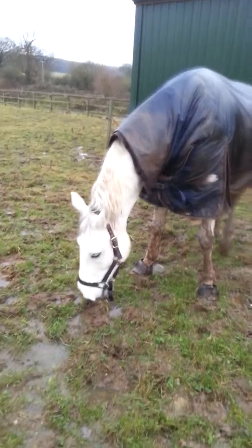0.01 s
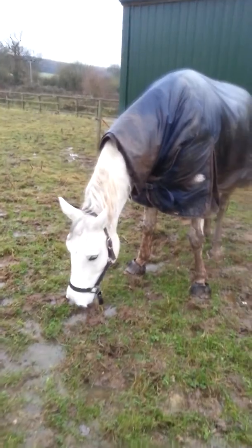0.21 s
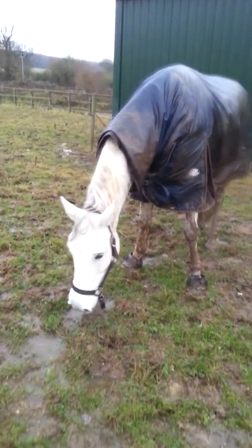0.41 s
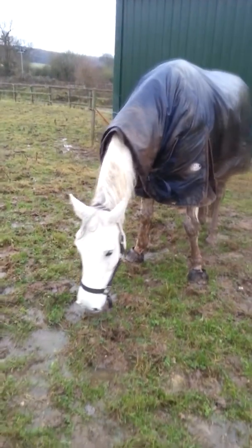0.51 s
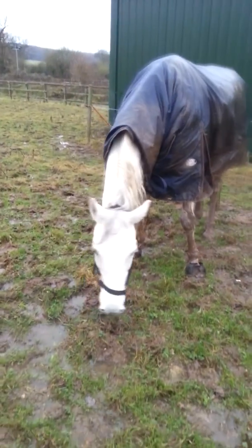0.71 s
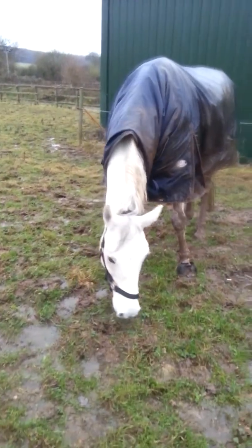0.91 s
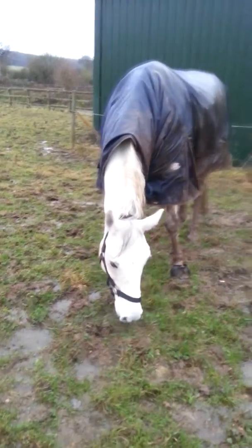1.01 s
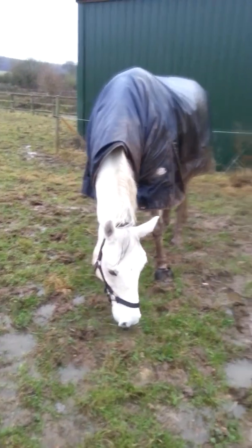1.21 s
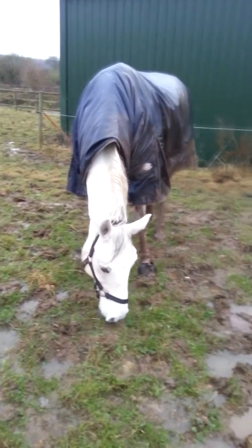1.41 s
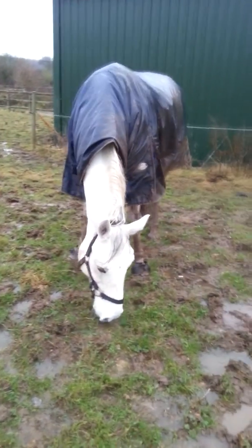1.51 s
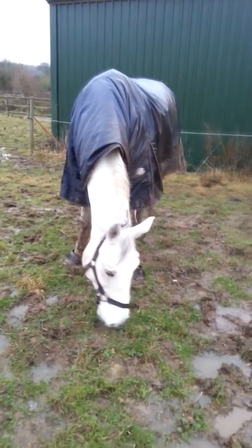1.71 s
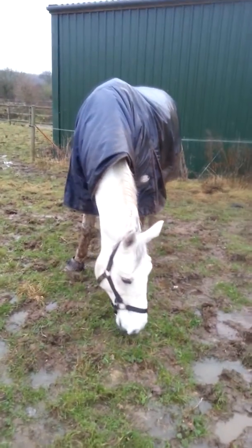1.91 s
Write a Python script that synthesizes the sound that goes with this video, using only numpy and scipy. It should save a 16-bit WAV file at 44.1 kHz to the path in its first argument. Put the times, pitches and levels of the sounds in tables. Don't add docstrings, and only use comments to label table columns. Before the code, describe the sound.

Close stereo outdoors: a brief crackly sniff leads into a single loose, rapid flapping horse snort under a second long, followed by soft rustle, tiny ticks and low wind thumps on the right channel.

```python
import sys
import numpy as np
from scipy import signal
from scipy.fft import rfft, irfft
from scipy.io import wavfile

SR = 44100
rng = np.random.default_rng(int(sys.argv[2]) if len(sys.argv) > 2 else 0)


def transcribe(signal):
    frames = np.atleast_2d(signal).T
    limited = np.clip(frames, -1, 1)
    pcm = np.round(limited * 32767).astype(np.int16)
    wavfile.write(sys.argv[1], SR, pcm)


def linear_from_db(decibels):
    return 10 ** (np.asarray(decibels, float) / 20)


N = 88200

# flaps so far, time in seconds.
NEAR_PACE = [(0, .2387), (1, .2693), (2, .3004), (3, .3332), (4, .3642), (5, .3972), (6, .4315), (8, .5),
             (10, .5662), (11, .6001), (13, .6656), (16, .7689), (17, .805), (18, .8426), (19, .8836)]
FAR_PACE = [(0, .2297), (1, .2633), (2, .2977), (3, .3312), (5, .4072), (6, .4455), (8, .5236), (9, .5624),
            (10, .601), (12, .6754), (13, .714), (15, .796), (16, .838)]
# time in seconds, level in dB.
NEAR_FORCE = [(.235, -5.5), (.27, -1), (.335, -1), (.365, -8), (.4, -13), (.43, -13.5), (.5, -15.5),
              (.55, -11), (.6, -15.5), (.68, -15.5), (.77, -11), (.81, -12.5), (.885, -24)]
FAR_FORCE = [(0.227, -17), (.263, -5), (.3, -0.5), (.335, -7.5), (.37, -5), (.41, -11), (.485, -15.5),
             (.53, -12.5), (.6, -14), (.64, -13.5), (.72, -18), (.76, -24), (.84, -22.5)]
# time in seconds, pitch in Hz.
NEAR_COLUMN = [(.235, 716), (.27, 756), (.335, 733), (.4, 665), (.57, 670), (0.599, 566), (.64, 734),
               (.77, 725), (.885, 660)]
FAR_COLUMN = [(.227, 630), (.263, 640), (.3, 690), (.37, 654), (.44, 660), (.485, 540), (.55, 710),
              (.71, 520), (.76, 680), (.84, 620)]
# time in seconds, level in dB.
WETNESS = [(.235, -10), (.27, -1.5), (.3, -1), (.335, -17.5), (.43, -2.5), (.58, -5.5), (.68, -10),
           (.77, 1), (.88, -14)]
# pitch in Hz, width in Hz, level in dB, left over right in dB.
NASAL = [(1357, 350, -14.5, -2), (2322, 396, -15.5, -6), (3000, 337, -19, 1), (3820, 660, -21.5, -8),
         (4740, 330, -27.5, -7.5)]
# time in seconds, level in dB.
OPENING = [
    (.235, -13),
    (.35, -5.5),
    (.5, -2.5),
    (.58, 6),
    (.7, -1.5),
    (.85, -6.5),
]
# time in seconds, level in dB.
FLOW = [
    (.19, -57),
    (.235, -36.5),
    (.28, -34.5),
    (.34, -33),
    (.42, -42),
    (.8, -41.5),
    (.89, -43.5),
    (.93, -49),
    (1.0, -55),
]
# time in seconds, level in dB.
HISS = [
    (.19, -54.5),
    (.25, -42),
    (.29, -41),
    (.33, -36),
    (.43, -48.5),
    (.6, -55),
    (.86, -65),
    (.893, -41.5),
    (.94, -57),
]
# time in seconds, level in dB.
SNIFF = [
    (.1, -65),
    (.128, -39),
    (.1315, -40),
    (.134, -29.5),
    (.14, -31),
    (.152, -42),
    (.167, -33),
    (.182, -43.5),
    (.2, -43),
]
# time in seconds, level in dB.
SNIFF_HISS = [(.097, -60), (.103, -46), (.12, -43.5), (.13, -51), (.14, -46), (.155, -53), (.17, -55),
              (.2, -53)]
# pitch in Hz, width in Hz, level in dB.
MUZZLE = [(796, 160, 0), (1175, 134, 1), (1350, 190, 5), (1800, 370, 3.5), (2400, 330, 2),
          (3300, 1050, 4.5), (4430, 560, -3), (5500, 880, 2)]
# time in seconds, level in dB, pitch in Hz.
BUFFETS = [(.009, -30, 175), (0.022, -32, 123), (0.2054, -18.5, 212), (0.852, -19, 230), (0.868, -22, 203),
           (.876, -17, 230), (0.895, -24, 254), (.965, -37, 200), (1.052, -41, 224), (1.063, -27.5, 226),
           (1.077, -26, 169), (1.117, -25.5, 139), (1.127, -27.5, 278), (1.258, -35, 230),
           (1.316, -28.5, 186), (1.327, -23, 230), (1.505, -21.5, 176), (1.513, -19, 209),
           (1.521, -22.5, 178), (1.538, -36, 200), (1.5446, -26, 203), (1.55, -31, 172), (1.562, -24, 210),
           (1.569, -30.5, 150), (1.584, -35, 204), (1.602, -30, 225), (1.643, -24, 267), (1.664, -24, 282),
           (1.706, -14.5, 270), (1.713, -10.5, 296), (1.75, -12.5, 274), (1.756, -22, 243),
           (1.772, -19.5, 245), (1.787, -28.5, 243)]
# time in seconds, level in dB.
GUST = [(0, -41.5), (.06, -55.5), (.19, -54), (.25, -36.5), (.5, -42), (.8, -39), (.9, -44), (1.0, -44.5),
        (1.14, -49.5), (1.3, -43), (1.45, -49.5), (1.52, -36), (1.62, -41), (1.7, -36.5), (1.78, -30),
        (1.82, -59.5), (2, -59)]
# time in seconds, peak in dB,
# ring in Hz, left over right in dB, snap in dB.
TICKS = [(0.075, -34, 1300, -7, 11), (.0765, -29, 2650, 1, -11), (.263, -12.5, 3130, -13, -18),
         (.2678, -6, 2410, -10, -25), (0.2999, -14.5, 2400, -9, -25), (.334, -40, 5500, -4, 6),
         (.288, -17, 4830, -12, -20), (.291, -27.5, 5000, -14, -20), (.694, -26, 3800, -6, -9),
         (.997, -37, 1990, -3, 3), (0.104, -35, 3300, -13, 13.5), (0.31, -16, 2270, 10, -22),
         (.321, -14.5, 2400, -9, -23), (0.388, -20.5, 2020, 2, -6), (0.89, -18, 3140, -2, -26),
         (.9404, -40, 3500, 14, 10), (1.035, -38.5, 4950, 19, -6), (1.062, -43.5, 3000, -16, 18),
         (1.0826, -33, 1040, 0, -11), (1.1199, -26, 1450, -6.5, 7), (1.1209, -26, 3200, -10, 1),
         (1.1794, -38.5, 2040, 8, -3), (1.2685, -47, 1150, 5, -3), (1.4253, -51, 3000, 2, 3),
         (1.472, -34.5, 2500, 1, -2), (1.487, -37, 1430, -12, 5), (1.5725, -34.5, 1560, -13.5, 9),
         (1.617, -35, 1160, -16, 14.5), (1.629, -38, 1350, -14, 15.5), (1.7048, -30, 3580, -6, -7),
         (1.733, -32, 2600, -2, -9), (1.737, -29, 2190, -3, -9), (1.743, -34, 2400, -3, -9),
         (1.7774, -30, 1350, -8.5, 5.5), (1.778, -29, 650, -7, -20), (1.804, -38, 2150, -8, -9),
         (1.84, -44, 1530, -3, 0)]
# time in seconds, level in dB.
RUSTLE = [(0, -53.5), (.8, -51), (.95, -54.5), (1.13, -50), (1.25, -57.5), (1.41, -53.5), (1.45, -48),
          (1.52, -50), (1.58, -47), (1.65, -55.5), (1.8, -59), (2, -63.5)]
# pitch in Hz, level in dB per Hz.
AIR = [(30, -3.5), (200, -3.5), (560, -1), (1100, -2.5), (1800, -9), (3700, -18.5), (6200, -20.5),
       (9000, -19)]
# pitch in Hz, likeness where 1 is the same.
LIKENESS = [(60, 0.97), (300, 0.75), (640, 0.7), (1400, 0), (3000, 0), (7000, 0)]
# pitch in Hz, left over right in dB.
LEAN = [(60, -14), (180, 6.5), (540, -3.5), (1630, -2.5), (4910, -11), (14800, -1.5)]

NEAR_HZ, NEAR_WIDTH_HZ, FAR_WIDTH_HZ = 640, 234, 360
SOFT_HZ, VENT_HZ = 690, 170
LEAD_S = .0021
FLAP_LUCK_DB, MODE_LUCK_DB = .7, 3.5
SPRAY_S, SPRAY_DB = 0.0062, -5
SIBILANT_HZ, SIBILANT_DB = 3500, -3.5
HORSE_PAN_DB, PORT_LAG = -4, 4
GROUND_S, GROUND_DB = .0037, -12
WIND_HZ, BUFFET_DAMPING = 230, 1
TICK_CYCLES = 5.8
SNAP_HZ, SNAP_WIDTH_HZ = 4300, 1800
RUSTLE_PER_S = 2500
DRIP_S, DRIP_DB, DRIP_HZ = 1.976, -41, 420
AIR_DB = -49.5
HEADROOM, CUTOFF_HZ = .95, 15200


def rms_one(x):
    return x / np.sqrt(np.mean(x ** 2) + 1e-20)


def in_time(rows):
    return np.interp(np.arange(N) / SR, *np.transpose(rows), left=-120, right=-120)


def at_hz(points, hz):
    f, v = np.transpose(points)
    return np.interp(np.log(np.maximum(hz, 20)), np.log(np.maximum(f, 20)), v)


def cut(x, hz, kind, order=2):
    return signal.sosfilt(signal.butter(order, hz, kind, fs=SR, output="sos"), x)


def drift(rate):
    noise = rng.standard_normal(N + 9000)
    return rms_one(cut(noise, rate, "low")[-N:])


def ring(x, hz, width_hz):
    r, w = np.exp(-np.pi * width_hz / SR), 2 * np.pi * hz / SR
    return signal.lfilter([0, np.sin(w)], [1, -2 * r * np.cos(w), r * r], x + 1e-18)


def body(x, peaks):
    out = 0
    for k, (hz, width, db, *_) in enumerate(peaks):
        out = out + (-1) ** k * linear_from_db(db) * ring(x, hz, width)
    return out


def grains(rate, spread_db):
    sizes = linear_from_db(spread_db * np.minimum(rng.exponential(1, N), 4)) * rng.choice([-1, 1], N)
    return rms_one(sizes * (rng.random(N) < rate / SR))


def place(x, pan_db):
    return np.array([np.roll(x, -PORT_LAG), x]) * linear_from_db(np.array([[pan_db / 2], [-pan_db / 2]]))


def horse():
    near = nostril(NEAR_PACE, NEAR_FORCE, NEAR_COLUMN, NEAR_WIDTH_HZ)
    far = nostril(FAR_PACE, FAR_FORCE, FAR_COLUMN, FAR_WIDTH_HZ)
    direct = near + far + breath() + sniff()
    return direct + linear_from_db(GROUND_DB) * np.roll(direct, int(GROUND_S * SR), axis=1)


def nostril(pace, force, column, width_hz):
    count, when = np.transpose(pace)
    flap_times = np.interp(np.arange(count[-1] + 1), count, when) - LEAD_S
    at = (flap_times * SR).astype(int)
    luck = rng.standard_normal((len(at), 1 + len(NASAL)))
    strength = linear_from_db(np.interp(at / SR, *np.transpose(force)) + 4.5 + FLAP_LUCK_DB * luck[:, 0])

    knocks = np.zeros(N + 2000)
    column_hz = np.interp(at / SR, *np.transpose(column))
    for i, hit, hz in zip(at, strength, column_hz):
        knocks[i:i + 2000] += hit * ring(np.arange(2000) == 0, hz, width_hz)
    soft = cut(cut(knocks[:N], SOFT_HZ, "low", order=6), VENT_HZ, "high")
    out = place(soft, HORSE_PAN_DB)

    spray = rng.standard_normal((2, N)) * linear_from_db(SPRAY_DB - 17.5)
    fade = np.exp(-1 / (SPRAY_S * SR))
    wet_db = np.interp(at / SR, *np.transpose(WETNESS))
    opening_db = np.interp(at / SR, *np.transpose(OPENING))
    for k, (top_hz, top_width, db, pan_db) in enumerate(NASAL):
        slap_db = wet_db + (k == 0) * opening_db + db + MODE_LUCK_DB * luck[:, 1 + k]
        slaps = np.zeros(N)
        slaps[at + 45] = strength * linear_from_db(slap_db)
        both = place(slaps, pan_db)
        droplets = signal.lfilter([1], [1, -fade], both) * spray
        ringing = ring(both + droplets, top_hz, top_width)
        out = out + cut(ringing, [top_hz * 0.89, top_hz * 1.235], "band", order=1)
    return out


def breath():
    air = rng.standard_normal((5, N))
    low = rms_one(cut(ring(air[0], NEAR_HZ, 550), 1014, "low", order=4))
    top = rms_one(cut(body(air[1:3], NASAL), 1920, "high"))
    top = top + linear_from_db(SIBILANT_DB) * cut(air[3:], [SIBILANT_HZ, 10000], "band")
    lean = linear_from_db(np.array([[-2.0], [2.0]]))
    stream = place(linear_from_db(in_time(FLOW) + 3.9 * drift(46)) * low, HORSE_PAN_DB)
    return stream + linear_from_db(in_time(HISS) + 2.2 * drift(73)) * top * lean


def sniff():
    wet = grains(3000, 1.3) + 1.2 * np.array([grains(3000, 5.1), grains(3000, 1.9)])
    lean = linear_from_db(np.array([[-2.5], [2.5]]))
    thin = cut(wet, [2600, 5200], "band") + linear_from_db(-8) * cut(wet, [5000, 12000], "band")
    crackle = linear_from_db(in_time(SNIFF)) * rms_one(body(wet, MUZZLE))
    return lean * (crackle + linear_from_db(in_time(SNIFF_HISS)) * rms_one(thin))


def wind():
    thumps, t = np.zeros(N), np.arange(N) / SR
    for s, db, hz in BUFFETS:
        u = (t - s) * hz
        swing = np.cos(2 * np.pi * u) + 0.14 * np.cos(2 * np.pi * u * 2.09)
        thumps -= linear_from_db(db) * swing * np.exp(-BUFFET_DAMPING * 2 * u ** 2)
    rumble = rms_one(cut(cut(grains(600, 1.0), WIND_HZ, "low", order=3), 65, "high"))
    right = thumps + linear_from_db(in_time(GUST) + 2.5 * drift(10.5)) * rumble
    return np.array([np.zeros(N), right])


def ticks():
    out = np.zeros((2, N))
    for s, db, hz, pan_db, snap_db in TICKS:
        click = np.zeros(N)
        click[int(s * SR) + 30] = linear_from_db(db)
        tone = cut(ring(click, hz, hz / TICK_CYCLES), [hz * 0.94, hz * 1.45], "band", order=1)
        snap = cut(ring(click, SNAP_HZ, SNAP_WIDTH_HZ), 2700, "high")
        out += place(tone + linear_from_db(snap_db - 3.0) * snap, pan_db)
    return out


def rustle():
    blades = [rms_one(cut(grains(RUSTLE_PER_S, 2.1), [1400, 3400], "band")) for _ in range(2)]
    return linear_from_db(in_time(RUSTLE) + 2 * drift(26)) * np.array(blades)


def drip():
    drop = np.zeros(N)
    drop[int(DRIP_S * SR)] = linear_from_db(DRIP_DB)
    return ring(drop, DRIP_HZ, 60)


def paddock():
    hz = np.arange(N // 2 + 1) * SR / N
    mid, side = rfft(rng.standard_normal((2, N)))
    alike, lean = np.clip(at_hz(LIKENESS, hz), 0, 1), at_hz(LEAN, hz) / 2
    both = []
    for sign in (1, -1):
        mixed = np.sqrt(1 + alike) * mid + sign * np.sqrt(1 - alike) * side
        both.append(linear_from_db(at_hz(AIR, hz) + sign * lean) * mixed)
    return linear_from_db(AIR_DB + 3.5 + .5 * drift(17.0)) * rms_one(irfft(np.array(both), N))


def scene():
    return horse() + wind() + ticks() + rustle() + drip() + paddock()


def band_limit(x):
    return signal.sosfilt(signal.butter(12, 15380, fs=SR, output="sos"), x)


def record(dry):
    bent = HEADROOM * np.tanh(cut(dry, 65, "high") / HEADROOM)
    top_cut = signal.cheby2(14, 70, CUTOFF_HZ, fs=SR, output="sos")
    mix = signal.sosfilt(top_cut, bent)
    return band_limit(mix)


dry = scene()
out = record(dry)
transcribe(out)
```